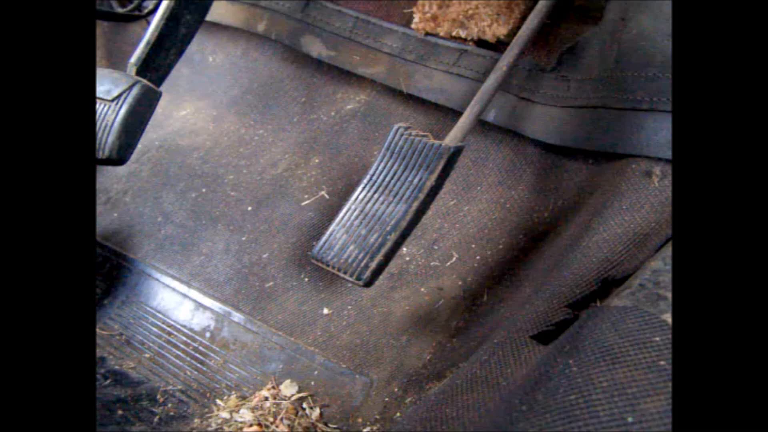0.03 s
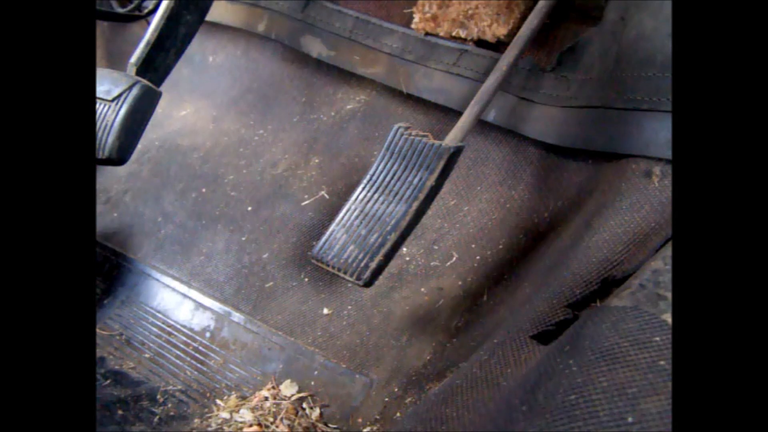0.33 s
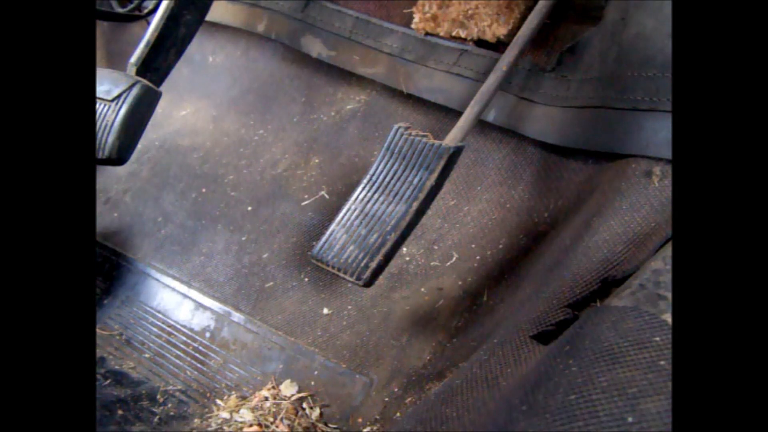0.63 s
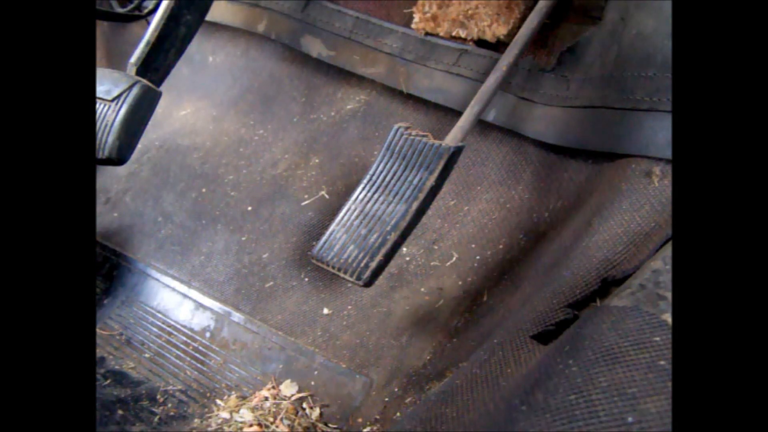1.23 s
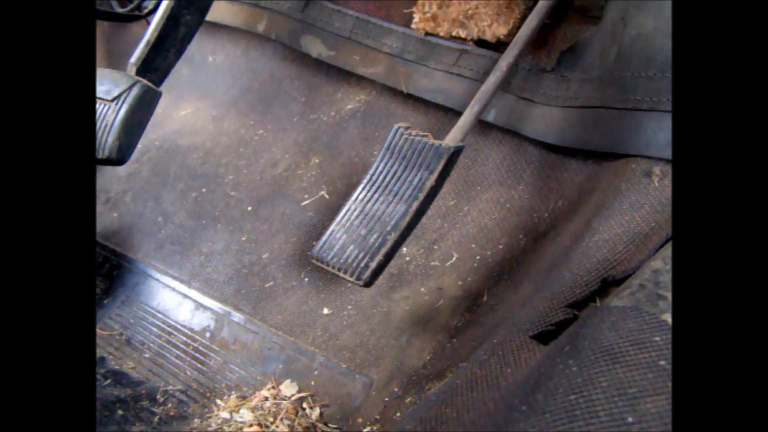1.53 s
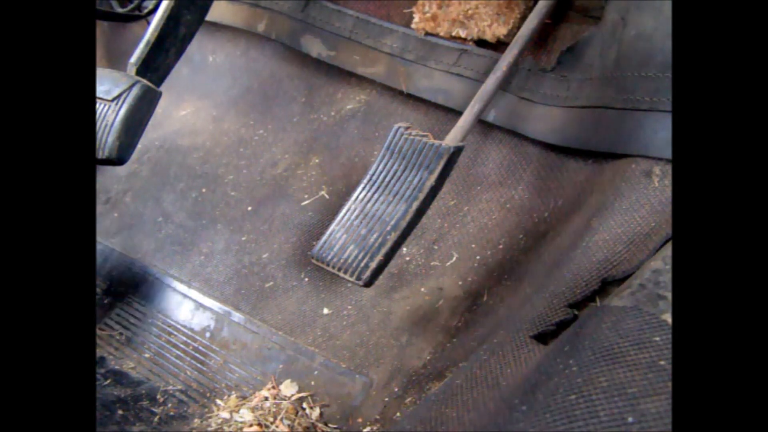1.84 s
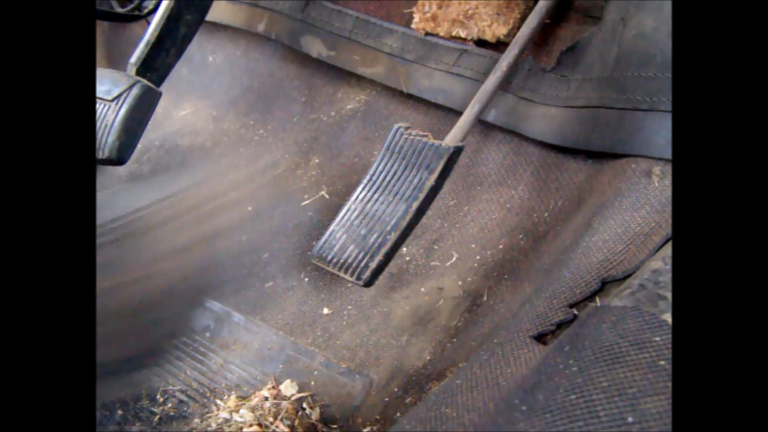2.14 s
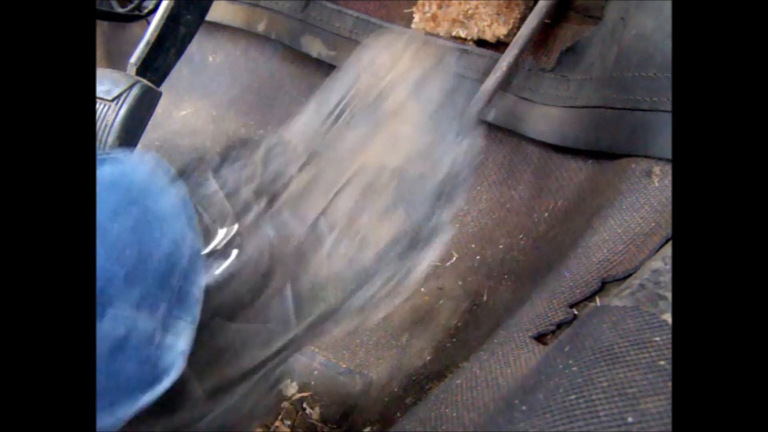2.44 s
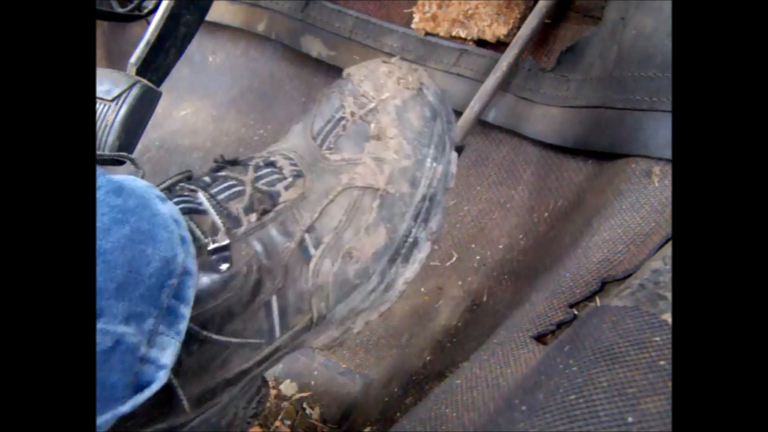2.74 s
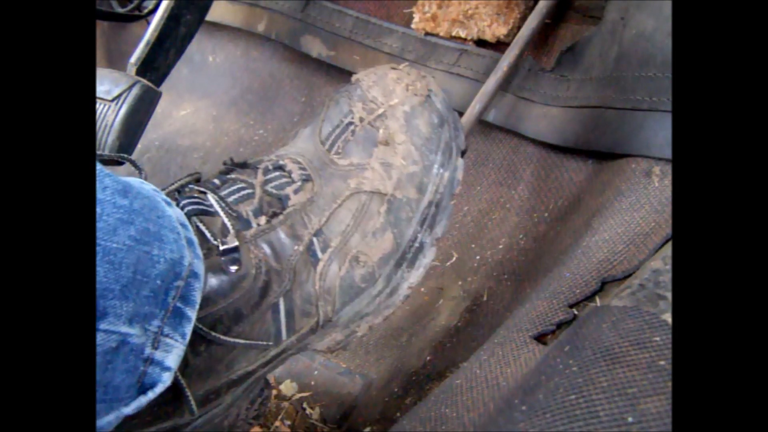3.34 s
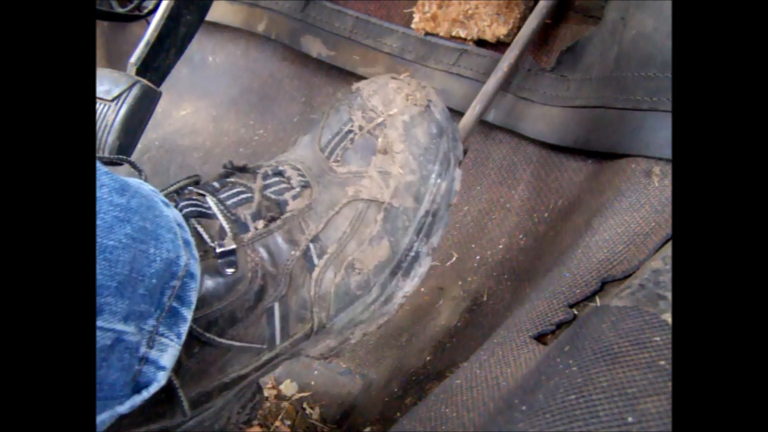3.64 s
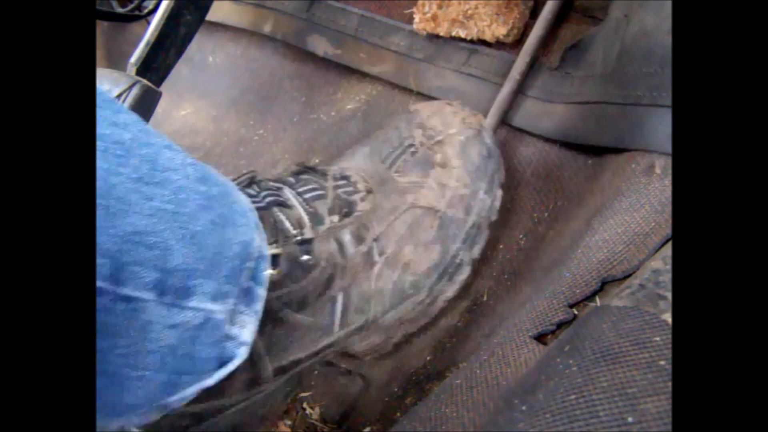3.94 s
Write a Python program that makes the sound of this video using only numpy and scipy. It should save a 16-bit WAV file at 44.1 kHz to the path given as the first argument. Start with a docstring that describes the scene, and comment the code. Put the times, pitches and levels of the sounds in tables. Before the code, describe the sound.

A boot clacks onto an old vehicle's pedal after a rustle of denim, presses it down with a thump, then scrapes off in a clatter. Heard close in the footwell, over outdoor hiss, a distant engine and faint birds.

```python
"""Outdoor rumble and hiss fade in around an old vehicle, with a far engine slowly sinking in pitch.
The driver shuffles and a few faint birds chirp. Denim rustles by friction as a boot swings in and
lands on the pedal: the impact clacks, the rubber sole squeaks and the linkage rings in its modes.
The boot presses down, the floor pan booms, and the sole scrapes over the pedal and off in a clatter."""
import sys
import numpy as np
from scipy import signal
from scipy.fft import rfft, irfft
from scipy.io import wavfile

SR = 44100
rng = np.random.default_rng(int(sys.argv[2]) if len(sys.argv) > 2 else 0)


def generate_wav(signal):
    """Clip the signal to [-1, 1] and save it as 16-bit WAV at the path in sys.argv[1]."""
    frames = np.transpose(np.atleast_2d(signal))
    scaled = np.clip(frames, -1, 1) * 32767
    pcm = np.round(scaled).astype(np.int16)
    wavfile.write(sys.argv[1], SR, pcm)


N = 176400
T = np.arange(N) / SR

# far engine: (time [s], fundamental [Hz], level [dB])
ENGINE_COURSE = [(.5, 56.6, -36), (1.0, 55.4, -36), (1.5, 53.8, -39), (2.0, 52.4, -40.5), (2.5, 51.5, -44),
                 (3.0, 50, -56.5), (4.0, 49, -53.5)]
# its partials: (frequency ratio [1], relative level [dB])
ENGINE_PARTIALS = [(1, -7.5), (1.39, -10.5), (2, 0.5), (2.13, -18), (2.55, -17.5), (3, -9.5), (3.39, -14.5),
                   (3.9, -16), (5, -30.5), (6, -28)]
# outdoor rumble: (frequency [Hz], relative density [dB]) and (time [s], level [dB])
RUMBLE_SPECTRUM = [(10, -32), (20, -15.5), (32, -8), (48, 9.5), (65, 1.5), (88, -8.5), (125, 5),
                   (160, -5.5), (240, -5), (320, -15.5), (450, -17), (560, -23), (700, -28), (1000, -26.5),
                   (3000, -43.5)]
RUMBLE_LEVEL = [(.5, -37), (.95, -39.5), (1.6, -38), (2.2, -38), (2.6, -39), (3.0, -38), (3.6, -39.5),
                (4, -40)]
# outdoor hiss: (frequency [Hz], relative density [dB]) and (time [s], level [dB])
HISS_SPECTRUM = [(100, -20), (400, -1), (800, -1.5), (1250, -4), (1600, -3), (2000, -1.5), (2800, -1),
                 (3200, 2), (3600, 1.5), (4200, -0.5), (5200, -6.5), (7000, -12.5), (8000, -29)]
HISS_LEVEL = [(.5, -49), (1.08, -52), (1.25, -47), (1.45, -41), (1.6, -44), (1.8, -44), (2.5, -44),
              (2.72, -46), (2.86, -42), (3.05, -46.5), (3.22, -47), (3.6, -47), (3.82, -44.5), (4, -32.5)]
# bands in the hiss: (centre [Hz], width [Hz], gain [dB]) and (time [s], level [dB])
SINGING_BANDS = [(1540, 170, -2.5), (3396, 230, -4.5), (3580, 130, 0), (3805, 660, -2), (4560, 290, -9)]
SINGING_LEVEL = [(.5, -68), (1.1, -64), (1.3, -50), (2.5, -48), (2.72, -49), (2.87, -42), (3.1, -59),
                 (3.4, -49), (3.65, -45.5), (3.85, -42)]
# shuffling: (frequency [Hz], relative density [dB])
SHUFFLE_SPECTRUM = [(100, -18.5), (250, -4), (400, -3), (570, 4), (700, -12), (1000, -7.5), (1600, -21.5),
                    (5000, -21)]
# bird chirps: (time [s], duration [s], pitch [Hz], level [dB], bandwidth [Hz])
BIRD_CHIRPS = [(1.13, 0.08, 4170, -39.5, 420), (1.172, 0.065, 3524, -34, 170),
               (1.601, 0.065, 3520, -38.5, 120)]
# denim: (time [s], duration [s], level [dB]) and (frequency [Hz], relative density [dB])
DENIM_SWISHES = [(1.789, 0.79, -35), (3.264, 0.11, -42.5)]
DENIM_SPECTRUM = [(100, -10), (400, 1), (900, 0.5), (1600, 1), (2600, 4.5), (3700, 8.5), (4600, 4.5),
                  (5500, -4), (7000, -7.5), (8000, -28)]
# boot on pedal: (time [s], snap peak [dB], tilt [dB/octave], relative rattle [dB], relative ring [dB])
PEDAL_CLACKS = [(2.224, -18.5, -5, 1, -29), (2.261, -26, 13.5, -14, -30), (2.269, -4.5, 4, -5, -30),
                (2.2699, -4.5, -2.5, -5.5, -30), (2.537, -18.5, -1, -19, -26), (2.612, -6, -4, 0, -22),
                (2.6133, -4.5, -7, -3.5, -25), (2.6158, -8, -3.5, 0.5, -30), (2.6987, -23.5, -2.5, 10, -26),
                (2.706, -22, -1.5, 1, -16), (3.398, -26, 3.5, 0, -27), (3.8816, -6.5, 5.5, -2, -11),
                (3.8852, -14, 3, -0.5, -20), (3.917, -19, 15, 7, -32), (3.934, -11, 2, -3, -25),
                (3.958, -13.5, 4, 3, -9.5), (3.9635, -16.5, -7.5, 0.5, -16), (3.985, -15.5, -3, -12, -17)]
# snap of that contact: (frequency [Hz], gain [dB])
CLACK_SPECTRUM = [(60, -32), (250, 1), (700, 5.5), (1100, 1), (1600, -0.5), (2400, 6), (3000, 4.5),
                  (3600, 4.5), (4400, 1), (5500, -7.5), (7000, -12), (8200, -49), (12000, -49.5)]
# steel pedal: (frequency [Hz], level [dB], T60 [s])
PEDAL_MODES = [(1500, -10.5, 0.071), (1541, -9.5, 0.091), (1814, -11.5, 0.14), (2335, -17, .05),
               (2470, -4.5, 0.023), (3010, 2, .015), (3267, 6, 0.031), (3590, 0.5, 0.025),
               (3830, -9, 0.038), (4800, -0.5, 0.015)]
# rubber stutter and squeak: (peak time [s], duration [s], pitch [Hz], level [dB])
SOLE_SQUEAKS = [(2.249, 0.0075, 235.4, -19.5), (2.2984, 0.0054, 4100, -22.5)]
# blows to the linkage: (time [s], level [dB], contact time [s])
LINKAGE_KNOCKS = [(2.27, -24.5, 0.0011), (2.6125, -15.5, 0.001), (2.962, -32, 0.0007),
                  (3.1008, -21, 0.00041), (3.118, -24, 0.00063), (3.232, -25.5, 0.0015),
                  (3.311, -33, 0.00044), (3.484, -34.5, 0.0003), (3.516, -29.5, 0.00048),
                  (3.613, -25, 0.0013), (3.709, -25, 0.00036), (3.864, -23, .001), (3.881, -24, 0.00089),
                  (3.932, -20.5, 0.00049), (3.986, -21.5, 0.00095)]
# pedal linkage: (frequency [Hz], level [dB], T60 [s])
LINKAGE_MODES = [(174, -18.5, 0.43), (269.5, -10.5, .13), (341.3, -6, .12), (384.5, -3.5, 0.1),
                 (456, -15, 0.054), (550, -11, 0.13), (769, -10, 0.051), (991, -22, 0.29), (1151, -13, 0.1),
                 (1640, -14, 0.083)]
# thumps on the floor: (time [s], level [dB], share of T60 [1])
FLOOR_THUMPS = [(2.6171, -17.5, 1), (2.703, -24, .8), (3.877, -31, 0.71), (3.944, -27, 1)]
# floor pan: (frequency [Hz], level [dB], full T60 [s])
FLOOR_MODES = [(32.1, 0.5, 0.56), (55, -1.5, 0.18), (118.8, -6, 0.38), (302, -11, 0.14)]
# sole on pedal: (time [s], duration [s], level [dB], tilt [dB/octave])
SOLE_SCRAPES = [(2.626, 0.056, -34, -3), (2.702, 0.027, -32, -4.5), (2.949, 0.054, -33, -4.5),
                (3.382, 0.082, -34, -0.5), (3.456, 0.15, -34.5, -3), (3.707, 0.055, -36, -5),
                (3.863, 0.045, -26.5, 0), (3.91, 0.066, -22.5, 1), (3.937, 0.11, -23, -1)]
# its friction noise: (frequency [Hz], relative density [dB])
SOLE_SPECTRUM = [(50, -4), (130, -9), (350, 4), (700, -3), (1100, -5), (1700, -1.5), (2600, -0.5),
                 (3500, 4.5), (5000, -2), (6800, -8), (8000, -22)]


def amp(db):
    """Amplitude ratio of a level in decibels."""
    return 10 ** (np.asarray(db) / 20)


def unit(x):
    """Normalisation to unit rms."""
    return x / np.sqrt(np.mean(x ** 2) + 1e-20)


def curve(points):
    """Linear interpolation of (time, value) points over the scene."""
    return np.interp(T, *np.transpose(points))


def response(points, size, tilt_db=0):
    """Magnitude response on FFT bins, tilted per octave between 256 and 8192 Hz."""
    octave = np.log2(np.fft.rfftfreq(size, 1 / SR) + 1)
    hz, db = np.transpose(points)
    tilt = tilt_db * (np.clip(octave, 8, 13) - 11)
    return amp(np.interp(octave, np.log2(hz), db) + tilt)


def colour(x, points, tilt_db=0):
    """Filtering by multiplication of spectra, at unit rms."""
    return unit(irfft(rfft(x) * response(points, len(x), tilt_db), len(x)))


def wander(rate_hz):
    """Random modulation: low-passed noise of unit rms."""
    rolloff = 1 + (np.fft.rfftfreq(N, 1 / SR) / rate_hz) ** 4
    return unit(irfft(rfft(rng.standard_normal(N)) / rolloff, N))


def phase(hz):
    """Phase as the integral of frequency."""
    return 2 * np.pi * np.cumsum(hz) / SR


def add(mix, start, sound):
    """Superposition of a sound from a start time on."""
    part = mix[round(start * SR):][:len(sound)]
    part += sound[:len(part)]


def stroke(start, length, rise, fall):
    """Trapezoidal envelope of a rub; rise and fall are shares of its length."""
    progress = (T - start) / length
    return np.clip(progress / rise, 0, 1) * np.clip((1 - progress) / fall, 0, 1)


def ring(modes, t60_share=1, detune=0):
    """Free vibration after a blow: a sum of exponentially damped modes."""
    out, t = np.zeros(SR), T[:SR]
    for hz, db, t60 in modes:
        hz *= 1 + detune * rng.standard_normal()
        out += amp(db - 60 * t / (t60 * t60_share)) * np.sin(2 * np.pi * hz * t)
    return out


def far_engine(hum_hz=178, hum_db=-45.5, waver_rad=0.31, flutter_db=2.5):
    """Partials sink with their fundamental beside a steady hum; all waver in level and phase."""
    times, hz, db = np.transpose(ENGINE_COURSE)
    fundamental = phase(np.interp(T, times, hz))
    level = np.interp(T, times, db)
    partials = [(ratio * fundamental, level + relative) for ratio, relative in ENGINE_PARTIALS]
    partials.append((2 * np.pi * hum_hz * T, hum_db))
    out = np.zeros(N)
    for angle, rms_db in partials:
        peak = np.sqrt(2) * amp(rms_db + flutter_db * wander(14))
        out += peak * np.sin(angle + waver_rad * wander(4))
    return out


def rumble():
    """Outdoor noise with its power concentrated at low frequencies."""
    return amp(curve(RUMBLE_LEVEL)) * colour(rng.standard_normal(N), RUMBLE_SPECTRUM)


def hiss(flutter_db=0.9):
    """Broadband outdoor noise under slight amplitude modulation."""
    envelope = amp(curve(HISS_LEVEL) + flutter_db * wander(30))
    return envelope * colour(rng.standard_normal(N), HISS_SPECTRUM)


def singing():
    """Resonance: narrow bands of noise sing within the hiss."""
    hz = np.fft.rfftfreq(N, 1 / SR)
    gain = sum(amp(db) / (1 + ((hz - centre) / width) ** 2) ** 2 for centre, width, db in SINGING_BANDS)
    bands = unit(irfft(rfft(rng.standard_normal(N)) * gain, N))
    return amp(curve(SINGING_LEVEL)) * bands


def shuffle(level_db=-53, clump_db=5):
    """Friction makes dull, uneven scuffs as the driver shifts weight."""
    scuffs = rng.standard_normal(N) * amp(clump_db * np.clip(wander(14), -2, 2))
    envelope = stroke(start=0.876, length=1.52, rise=0.071, fall=0.071)
    return amp(level_db) * envelope * colour(scuffs, SHUFFLE_SPECTRUM)


def birds(fall_share=0.022, echo_s=0.03):
    """Falling chirps, blurred by distance into narrowband noise with an exponential tail."""
    out = np.zeros(N)
    for start, length, hz, db, width in BIRD_CHIRPS:
        progress = np.clip((T - start) / length, 0, 1)
        angle = phase(hz * (1 + fall_share * (.5 - progress)))
        past_peak = T - start - length / 2
        envelope = np.where(past_peak < 0, np.sin(np.pi * progress) ** 2, amp(0) * np.exp(-abs(past_peak) / echo_s))
        out += amp(db) * envelope * (wander(width) * np.cos(angle) + wander(width) * np.sin(angle))
    return out


def denim(grain_db=1.0):
    """Sliding friction of the trouser leg gives grainy noise as the foot moves."""
    cloth = colour(rng.standard_normal(N) * amp(grain_db * wander(150)), DENIM_SPECTRUM)
    return cloth * sum(amp(db) * stroke(start, length, rise=0.17, fall=0.5)
                       for start, length, db in DENIM_SWISHES)


def pedal_clacks(size=8192, rattle_rise_s=.0008, rattle_t60_s=0.11):
    """A sharp impact excites the pedal's modes and rattles briefly in the footwell."""
    out, t = np.zeros(N), T[:size]
    for start, db, tilt_db, rattle_db, ring_db in PEDAL_CLACKS:
        gain = response(CLACK_SPECTRUM, size, tilt_db)
        log_gain = np.log(np.r_[gain, gain[-2:0:-1]])
        # minimum phase packs the energy at the onset
        snap = np.fft.ifft(np.exp(np.conj(signal.hilbert(log_gain)))).real
        tail = rng.standard_normal(size) * amp(-60 * t / rattle_t60_s) * np.minimum(t / rattle_rise_s, 1)
        rattle = amp(rattle_db) * signal.fftconvolve(snap, tail / np.linalg.norm(tail))[:size]
        contact = (snap + rattle) / abs(snap).max()
        steel = amp(ring_db) * ring(PEDAL_MODES, detune=0.0032)[:size]
        add(out, start, -amp(db) * (contact + steel))
    return out


def sole_squeaks(jitter=0.078):
    """Stick-slip oscillation of rubber, brief and unsteady in pitch."""
    out = np.zeros(N)
    for peak_s, length, hz, db in SOLE_SQUEAKS:
        envelope = np.exp(-(2 * (T - peak_s) / length) ** 2)
        out += amp(db) * envelope * np.sin(phase(hz * (1 + jitter * wander(590))))
    return out


def linkage_knocks():
    """Padded blows ring the linkage; a longer contact excites the high modes less."""
    out, t = np.zeros(N), T[:SR // 50]
    for start, db, contact_s in LINKAGE_KNOCKS:
        force = t * np.exp(-4 * t / contact_s)
        knock = signal.fftconvolve(ring(LINKAGE_MODES, detune=0.0091), force / force.sum())
        add(out, start, -amp(db) * knock)
    return out


def floor_thumps(rise_s=0.0034):
    """The weight of the foot excites the low plate modes of the floor pan."""
    out = np.zeros(N)
    onset = np.minimum(T[:SR] / rise_s, 1)
    for start, db, t60_share in FLOOR_THUMPS:
        add(out, start, amp(db) * onset * ring(FLOOR_MODES, t60_share))
    return out


def sole_scrapes(grains_per_s=4500, spread_db=0.5, noise_ratio=0.31, judder_db=1.5):
    """Stick-slip of grit between sole and ribbed pedal gives a random train of impulses."""
    out = np.zeros(N)
    for start, length, db, tilt_db in SOLE_SCRAPES:
        slips = (rng.random(N) < grains_per_s / SR) * rng.choice([-1, 1], N)
        grit = slips * amp(spread_db * np.minimum(rng.exponential(1, N), 3))
        rub = (unit(grit) + noise_ratio * rng.standard_normal(N)) * amp(judder_db * wander(110))
        envelope = stroke(start, length, rise=0.18, fall=0.67)
        out += amp(db) * envelope * colour(rub, SOLE_SPECTRUM, tilt_db)
    return out


def scene():
    """Superposition of all sources in the footwell, in mono."""
    friction = shuffle() + denim() + sole_scrapes() + sole_squeaks()
    impacts = pedal_clacks() + linkage_knocks() + floor_thumps()
    outdoors = far_engine() + rumble() + hiss() + singing() + birds()
    return (outdoors + friction + impacts)[None]


def record(dry, start_s=.415, full_s=.88, fade_db=-28.5, ceiling=.88, cutoff_hz=8000):
    """Silence, then a fade-in; saturation rounds the loudest peaks and a low-pass limits the band."""
    gate = np.clip((T - start_s) / 0.0087, 0, 1)
    fade = amp(fade_db * np.clip((full_s - T) / (full_s - start_s), 0, 1))
    saturated = dry / (1 + (dry / ceiling) ** 8) ** (1 / 8)
    low_pass = signal.firwin(181, cutoff_hz, window=("kaiser", 8), fs=SR)
    return signal.oaconvolve(saturated * gate * fade, low_pass[None], "same")


dry = scene()
out = record(dry)
generate_wav(out)
```